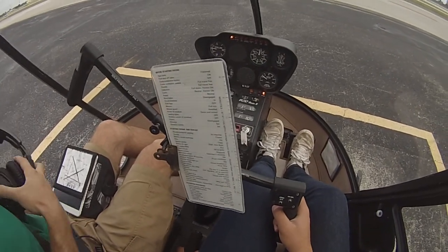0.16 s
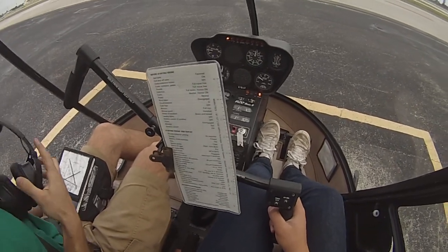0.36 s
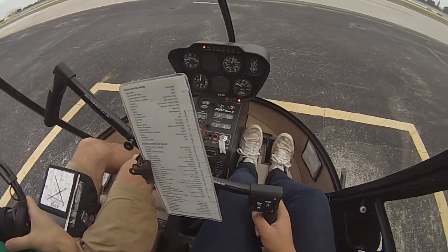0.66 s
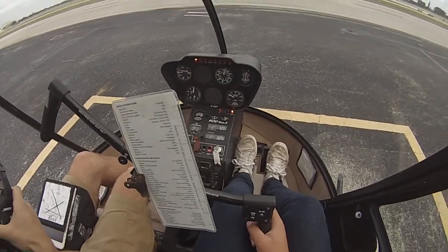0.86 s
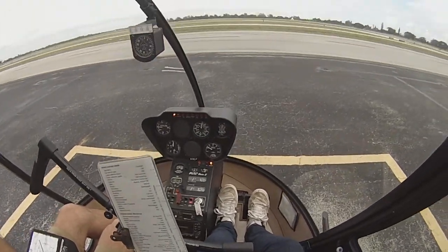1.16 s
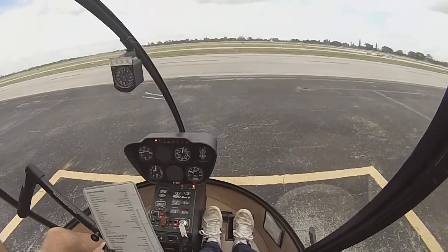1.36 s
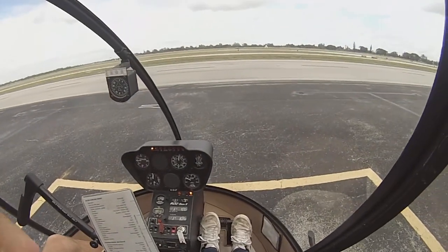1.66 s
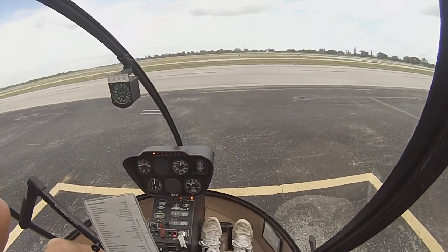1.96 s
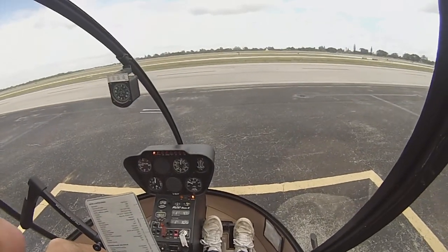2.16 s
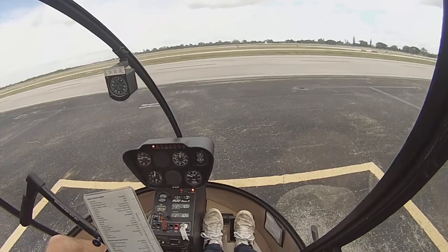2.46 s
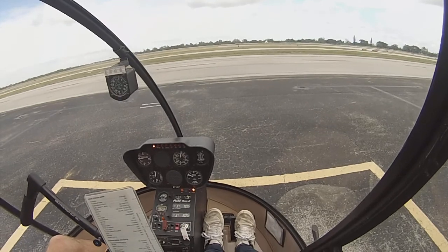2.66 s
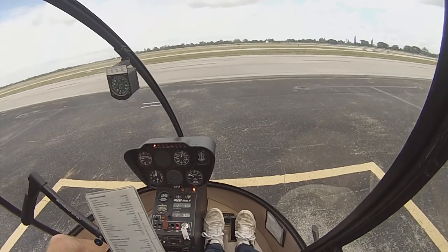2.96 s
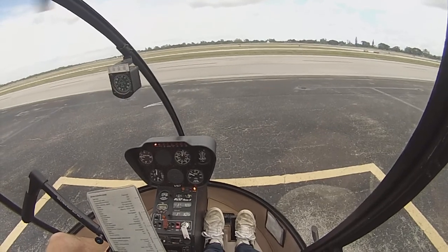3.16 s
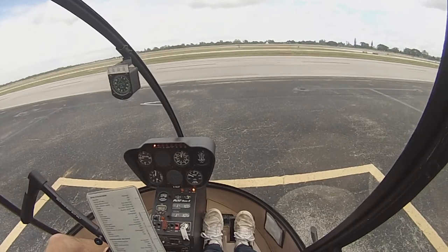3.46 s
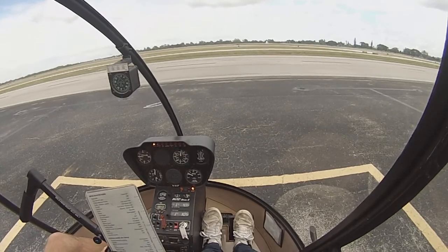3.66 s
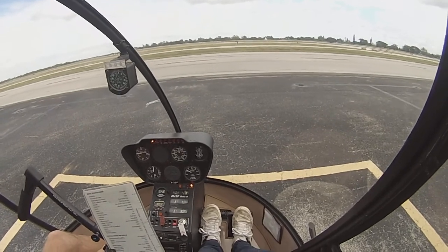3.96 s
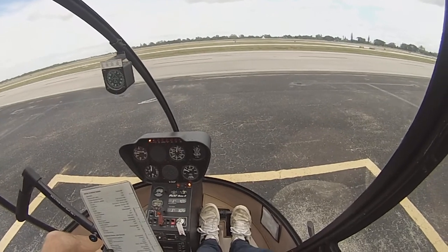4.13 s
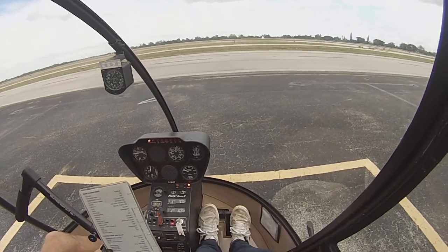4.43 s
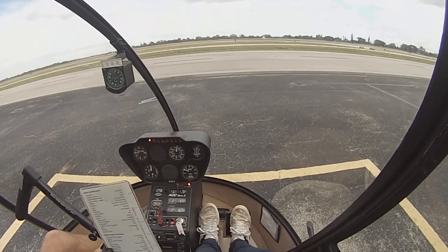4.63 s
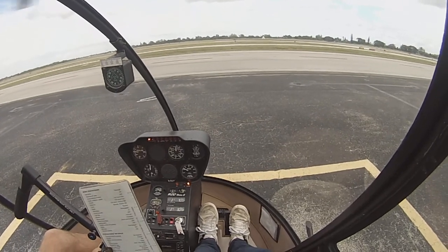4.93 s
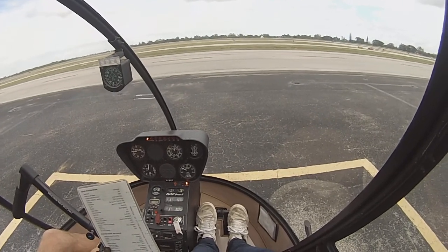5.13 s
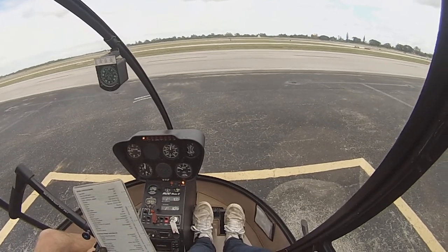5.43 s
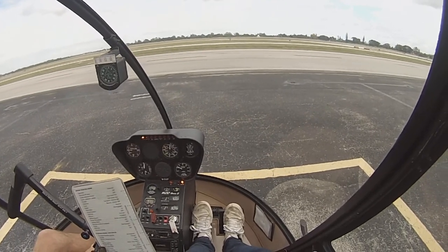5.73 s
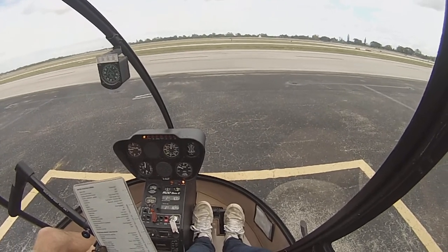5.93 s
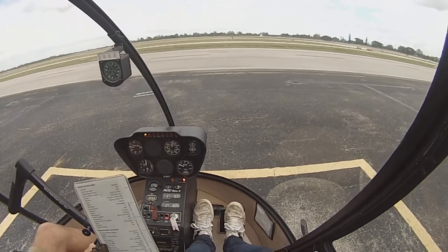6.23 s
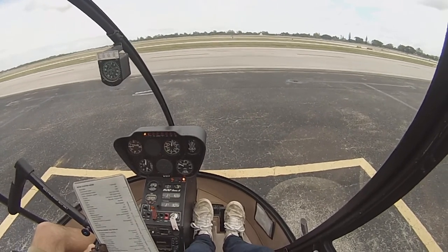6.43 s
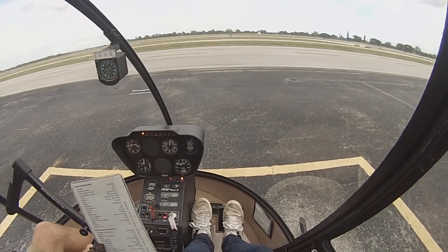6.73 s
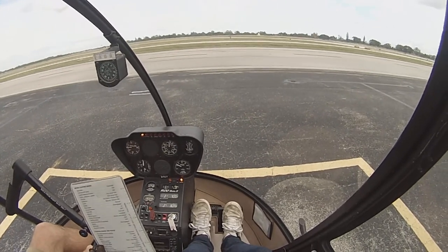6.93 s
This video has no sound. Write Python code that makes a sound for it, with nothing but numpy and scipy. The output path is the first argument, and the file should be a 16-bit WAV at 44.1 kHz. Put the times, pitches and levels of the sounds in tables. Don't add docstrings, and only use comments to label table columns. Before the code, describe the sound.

Inside a small parked helicopter, a piston engine idles steadily with a low pulsing drone, cabin rumble and rhythmic valve clatter. Two rotor blades swish softly overhead. The head-worn microphone lifts during the first two seconds, slightly changing the balance. A hard plastic part snaps into place early on, followed by a fainter tick.

```python
import sys
import numpy as np
from scipy import signal
from scipy.fft import rfft, irfft, next_fast_len
from scipy.io import wavfile
from scipy.ndimage import uniform_filter1d, map_coordinates

SR = 44100
rng = np.random.default_rng(int(sys.argv[2]) if len(sys.argv) > 2 else 0)


def volts(x):
    e = np.asarray(x, float) / 20
    return 10 ** e


def store_pcm(level_fs):
    pcm = np.round(np.clip(level_fs, -1, 1) * 32767).astype(np.int16)
    wavfile.write(sys.argv[1], SR, np.atleast_2d(pcm).T)


N = 312669

CYCLES_PER_ROTOR_TURN = 2.5075


def unit(x):
    return x / np.sqrt(np.mean(x ** 2) + 1e-20)


def along(points, hz):
    f, db = np.transpose(points)
    return volts(np.interp(np.log(hz + 1), np.log(f + 1), db))


def curves(rows):
    s, *cols = np.transpose(rows)
    return [np.interp(np.arange(N) / SR, s, c) for c in cols]


def wobble(rate):
    knots = rng.standard_normal(int(N * rate / SR) + 4)
    return map_coordinates(knots, [np.arange(N) * rate / SR])


def filtered(x, response):
    m = next_fast_len(N + SR // 2)
    return irfft(rfft(x, m) * response(np.fft.rfftfreq(m, 1 / SR)), m)[:N]


def bump(turn, place, width):
    return np.exp((np.cos(2 * np.pi * (turn - place)) - 1) / (2 * np.pi * width) ** 2)


def ringing(modes, f):
    power = 0
    for center, width, db in modes:
        detuning = (center * center - f * f) / (f * width + 1)
        power = power + volts(2 * db) / (1 + detuning ** 2) ** 2
    return np.sqrt(power)


def patchy(x, patch_db, size=9):
    z = signal.stft(x, nperseg=512)[2]
    field = uniform_filter1d(rng.standard_normal(z.shape), size=size, axis=0)
    field = uniform_filter1d(field, size=7, axis=1)
    return signal.istft(z * volts(patch_db * unit(field)), nperseg=512)[1][:N]


def bowed():
    start_s, end_s = 0.72, 1.83
    lift = np.clip((np.arange(N) / SR - start_s) / (end_s - start_s), 0, 1)
    return (1 + np.cos(np.pi * lift)) / 2


def electronics():
    # f/Hz, level/dB rms
    whine_lines = [(13000, -93), (14000, -96)]
    t = np.arange(N) / SR
    return sum(np.sqrt(2) * volts(db) * np.sin(2 * np.pi * hz * t) for hz, db in whine_lines)


def sizzle():
    catch_hiss = (1.38, 1.445, -56, 12800)
    start, end, db, low_hz = catch_hiss
    shape = np.interp(np.arange(N) / SR, [start, start + .006, end - .01, end], [0, 1, .75, 0])
    hiss = filtered(rng.standard_normal(N), lambda f: 1 / (1 + (low_hz / (f + 1)) ** 24))
    return volts(db) * shape * unit(hiss)


def snaps():
    # t/s, crack level/dB, crack t60/s
    contacts = [
        (1.3797, -32, .025),
        (1.3835, -34, .05),
        (1.3875, -35, .07),
        (2.1218, -37, .025),
        (2.1255, -40.5, .08),
    ]
    # f/Hz, level/dB per Hz
    crack_colour = [(300, -30), (700, -6), (1900, 2), (3300, -4), (4500, -8), (6000, -5), (7200, -22),
                    (10000, -22), (13000, -30), (17000, -120)]
    # t/s, level/dB, f/Hz, rise/(Hz/s), half-width/s
    landings = [
        (1.3882, -20, 420, 11000, .0044),
        (1.392, -34, 240, 0, .008),
        (2.1245, -36, 330, 0, .005),
        (2.8985, -27, 52, 0, .022),
    ]
    tap_db = 12
    cracks, t = np.zeros(N), np.arange(SR // 8) / SR
    for s, crack_db, t60 in contacts:
        decay = volts(crack_db - 60 * t / t60)
        cracks[round(s * SR):][:len(t)] += decay * rng.standard_normal(len(t))
        cracks[round(s * SR)] += volts(crack_db + tap_db)
    thumps = 0
    for s, db, hz, rise, half in landings:
        late = np.arange(N) / SR - s
        tone = np.cos(2 * np.pi * late * (hz + rise * late / 2))
        thumps = thumps + volts(db) * np.exp(-(late / half) ** 2) * tone
    return thumps + 2.9 * filtered(cracks, lambda f: along(crack_colour, f))


def blades(cycle, swish_db):
    # f/Hz, level/dB per Hz
    tip_hiss = [(1200, -64), (2500, 1), (3300, -13), (6000, -3.5), (6700, -10), (8200, -9), (8800, 0),
                (9700, -1.5), (11000, -4.5), (12000, -7), (12800, -26), (15000, -38)]
    gust_db, eddy_db = 1.1, 1.2
    turn = cycle / CYCLES_PER_ROTOR_TURN

    def swish(place, width):
        return bump(turn, place, width) * volts(gust_db * wobble(14)) * rng.standard_normal(N)

    def passing(place, leave):
        leaving = filtered(swish(place + .135, .065), lambda f: np.clip(f / 9000, .6, 1.5) ** 1.6)
        return swish(place, .05) + leave * leaving

    second = volts(-1.7) * passing(.575, .68)
    duller = filtered(second, lambda f: 1 / np.sqrt(1 + (f / 11100) ** 30))
    between = .17 * rng.standard_normal(N)
    hiss = patchy(passing(.075, .72) + duller, eddy_db) + between
    return volts(swish_db) * unit(filtered(hiss, lambda f: along(tip_hiss, f)))


def cabin(cycle, rumble_db, panel_db, clatter_db, rear_gain):
    # f/Hz, level/dB per Hz
    rumble_colour = [(8, -31), (20, -19), (30, -7), (50, -2), (65, -7), (85, -13), (112, -14), (130, -6),
                     (150, -12), (180, -10), (225, -15), (330, -21), (600, -60), (1200, -120)]
    # f/Hz, width/Hz, level/dB
    panel_modes = [(290, 80, -6.5), (360, 40, -2), (430, 110, -4), (496, 40, -1), (540, 70, -3),
                   (620, 110, -11), (730, 50, -10), (930, 70, -11), (870, 200, -14), (1090, 120, -17),
                   (1255, 70, -15)]
    clatter_swells = [(.2, 0.099), (.41, 0.48), (.6, 0.14), (.9, 1.27)]
    # f/Hz, width/Hz, level/dB
    casing_modes = [(1400, 200, -10), (1535, 90, -1), (1620, 130, 0), (1800, 200, -2), (1880, 60, -2),
                    (1980, 140, -6), (2120, 100, -9), (2350, 350, -13), (2700, 160, -9), (2950, 400, -8),
                    (3170, 200, -10), (3600, 380, -17), (4200, 280, -18), (4420, 350, -21),
                    (4800, 300, -19), (5300, 500, -25), (5720, 300, -18), (6200, 700, -22),
                    (6950, 500, -25)]
    # f/Hz, level/dB per Hz
    wash_colour = [(300, -45), (700, -10.5), (1200, -14.5), (2300, -17.5), (3400, -30), (5100, -30),
                   (6600, -39), (7800, -32.5), (12000, -30.5), (14200, -42.5), (15000, -40), (17000, -120)]
    # f/Hz, width/Hz, level/dB
    rear_modes = [(710, 70, -2), (820, 40, -5), (900, 110, -5), (1770, 160, 0), (2120, 110, -6),
                  (2690, 70, -8), (3620, 180, -17), (4850, 150, -18), (5720, 240, -14), (6200, 700, -19),
                  (7050, 250, -25)]
    rumble = filtered(rng.standard_normal(N), lambda f: along(rumble_colour, f))
    drumming = rng.standard_normal(N) * volts(1.0 * wobble(7))
    panels = filtered(drumming, lambda f: ringing(panel_modes, f))

    swell = 1
    for place, share in clatter_swells:
        swell = swell + share * volts(3 * wobble(20)) * bump(cycle, place, .025)
    downwash = volts(.45 * np.cos(4 * np.pi * (cycle / CYCLES_PER_ROTOR_TURN - .1)))
    drift = volts(0.3 * wobble(9) + 0.27 * wobble(4.97))
    rattle = rng.standard_normal((3, N)) * np.sqrt(swell) * drift * downwash
    clatter = filtered(rattle[0], lambda f: ringing(casing_modes, f))
    clatter = clatter + filtered(rattle[1], lambda f: along(wash_colour, f))
    rear = rear_gain * unit(filtered(rattle[2], lambda f: ringing(rear_modes, f)))
    front = volts(rumble_db) * unit(rumble) + volts(panel_db) * unit(panels)
    return front + volts(clatter_db) * unit(clatter) + rear


def knocks(cycle):
    valve_blows = [(0.56, -27), (.655, -29.5), (0.2, -58)]
    blows = np.zeros(N)
    for place, db in valve_blows:
        at = np.flatnonzero(np.diff(np.floor(cycle - place)))
        blows[at] += volts(db + 30 + 1.5 * wobble(12)[at])

    def wall(f):
        mode_hz, width_hz = 435, 130
        return 1j * f * width_hz / (mode_hz ** 2 - f * f + 1j * f * width_hz)

    return filtered(blows, lambda f: wall(f) ** 2)


def exhaust(cycle):
    # multiple of the two-turn engine cycle, level/dB rms
    firing_orders = [(2, -45.6), (3, -48.5), (4, -25.4), (5, -50.9), (6, -46.7), (8, -42.1), (9, -53.1),
                     (10, -60.3), (7, -66), (12, -42.5), (13, -65), (14, -60.5), (15, -59.6), (16, -53),
                     (17, -58), (18, -61.0), (20, -54), (21, -67), (22, -59), (23, -65), (24, -67),
                     (26, -66), (27, -65), (28, -64), (29, -66)]
    # multiple of the engine cycle, level/dB rms,
    # unsteadiness/dB
    shaft_orders = [(.797, -68, 2), (1.19, -71, 2), (1.594, -68, 2), (2.39, -57, 2), (2.58, -57, 2),
                    (4.35, -50.5, 2), (4.795, -48, 2), (5.11, -48, 2), (5.58, -54, 2), (10.22, -57, 2),
                    (11, -52, 1), (11.72, -58, 2), (13.11, -61, 2), (16.35, -66, 2), (35, -63, 1.5),
                    (36, -62, 1.5), (37, -61, 1.5), (46, -64, 1.5), (7.62, -57, 2), (8.345, -57, 2),
                    (10.9, -54, 2), (12.4, -58.5, 2), (29.85, -61, 3), (40.95, -54.5, 1.5), (60.1, -66, 3)]
    slip_turns = .09
    drone = 0
    for order, db in firing_orders:
        if order % 4 == 2:
            turns = order * cycle + .47
        else:
            turns = order * (cycle + .3325) - .33
        level = volts(db + .03 * order * wobble(4))
        drone = drone + level * np.cos(2 * np.pi * (turns + .001 * order * wobble(6)))
    drive = 0
    for order, db, swing_db in shaft_orders:
        level = volts(db + swing_db * wobble(2.5))
        turns = order * cycle + slip_turns * wobble(1 + order / 3)
        drive = drive + level * np.cos(2 * np.pi * turns)
    return np.sqrt(2) * (drone + drive)


def scene():
    # t/s, crank speed/rpm
    crank_speed = [(0.0, 1438.7), (0.886, 1441.1), (1.772, 1439.9), (2.659, 1444.9), (3.545, 1446.4),
                   (4.431, 1449.3), (5.318, 1451.1), (6.204, 1451.9), (7.09, 1457.4)]
    rpm, = curves(crank_speed)
    cycle = -.0712 + np.cumsum(rpm) / 120 / SR
    bow = bowed()
    rumble_db = -40 - 1.3 * bow
    panel_db = -46 - 2.5 * bow
    clatter_db = -43 + 0.7 * bow
    swish_db = -57.5 + 3 * bow
    rear_gain = volts(-47.5) * bow
    rumble_db = rumble_db - 0.4 * (rpm - rpm.mean())
    engine = exhaust(cycle) + knocks(cycle)
    engine = engine + cabin(cycle, rumble_db, panel_db, clatter_db, rear_gain)
    return (engine + blades(cycle, swish_db) + snaps() + sizzle())[None]


def roll_off(x):
    return signal.sosfilt(signal.butter(12, 15290, fs=SR, output="sos"), x)


def record(dry):
    thin_hz, top_hz, thin_db = 13500, 15250, 4.5
    top = filtered(dry[0], lambda f: (f > thin_hz) & (f < top_hz))
    body = filtered(dry[0], lambda f: f <= thin_hz)
    heard = body + volts(-2.5) * patchy(top, thin_db, size=3) + electronics()
    return roll_off(heard[None])


dry = scene()
out = record(dry)
store_pcm(out)
```